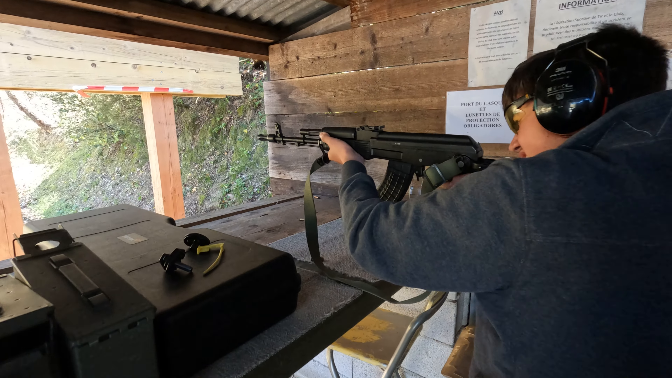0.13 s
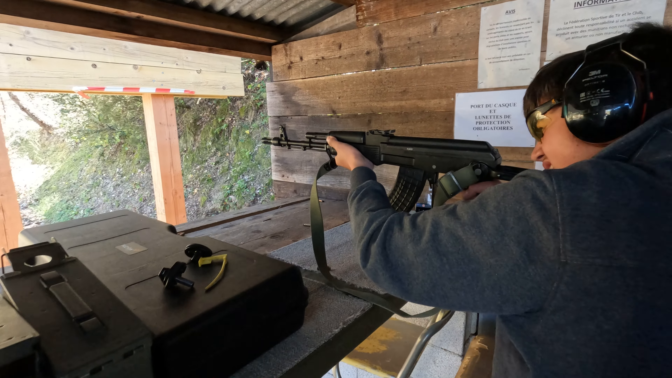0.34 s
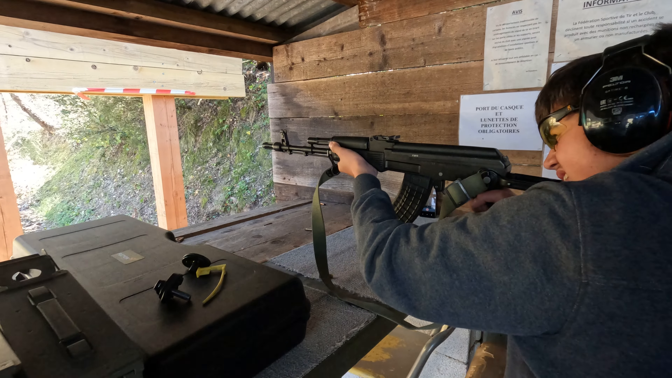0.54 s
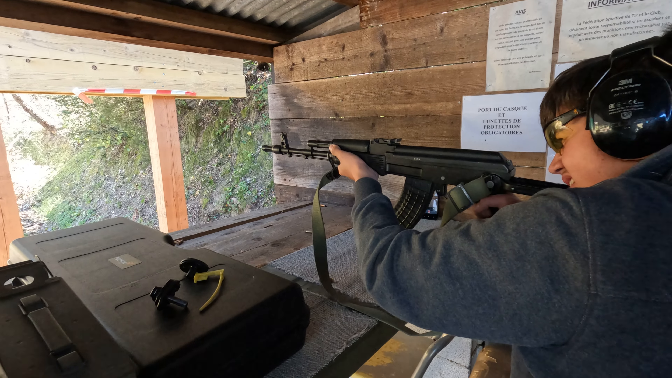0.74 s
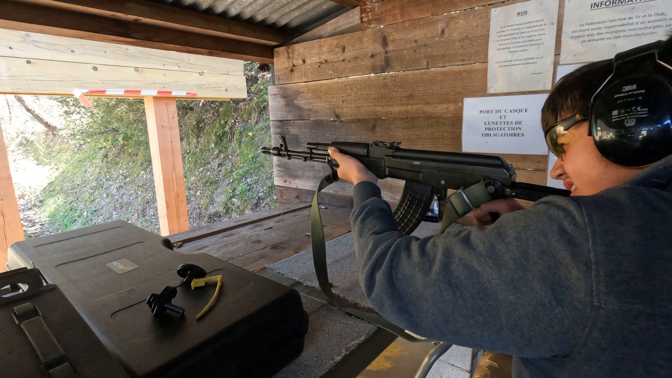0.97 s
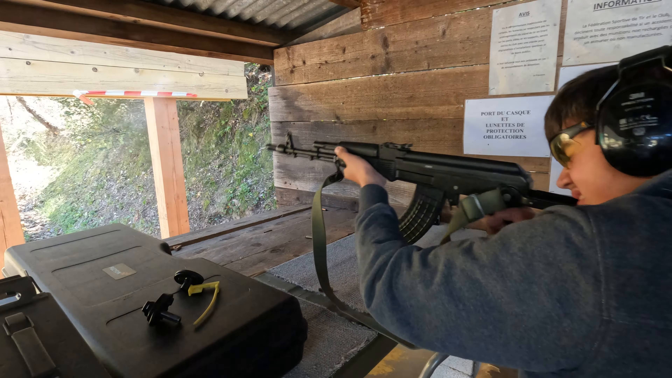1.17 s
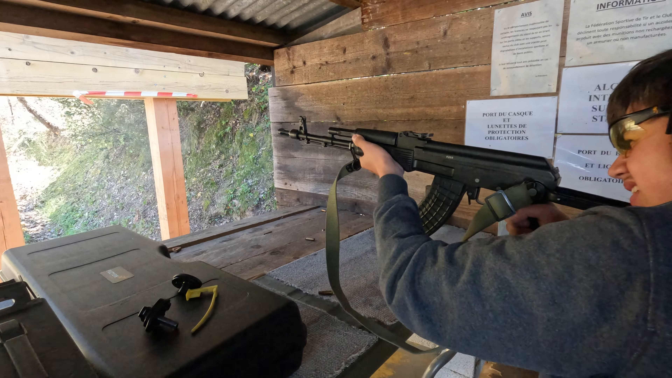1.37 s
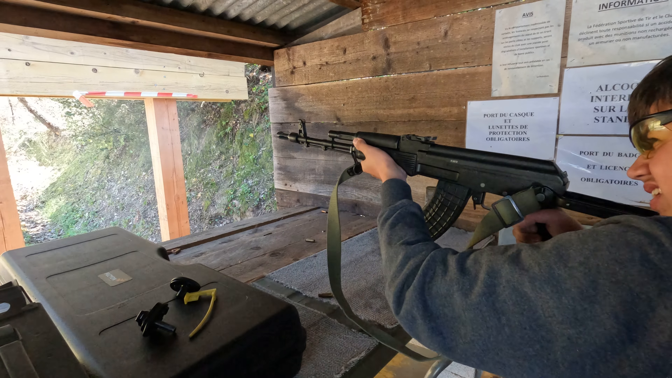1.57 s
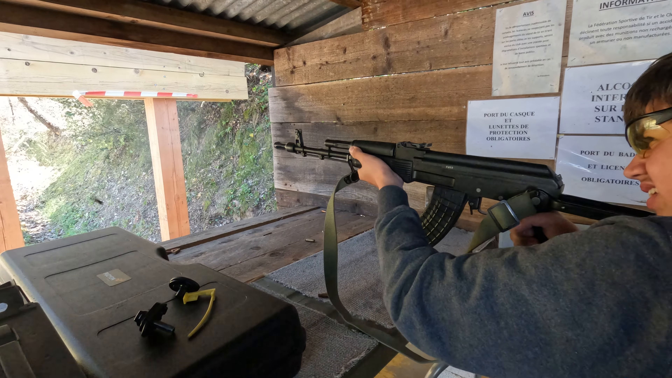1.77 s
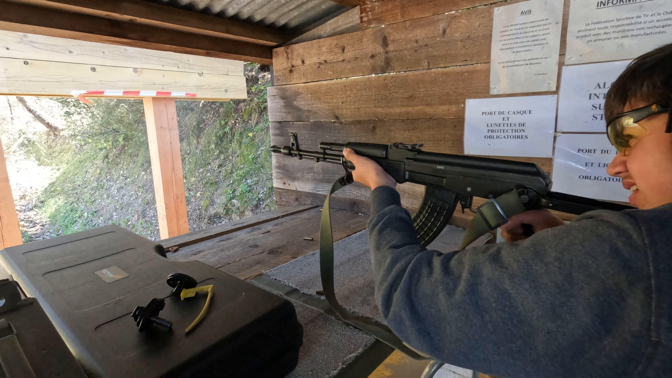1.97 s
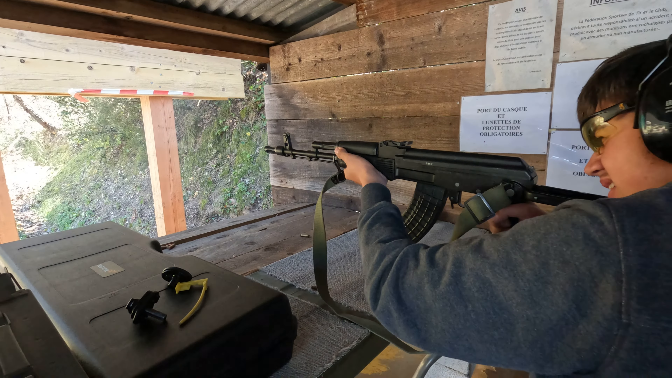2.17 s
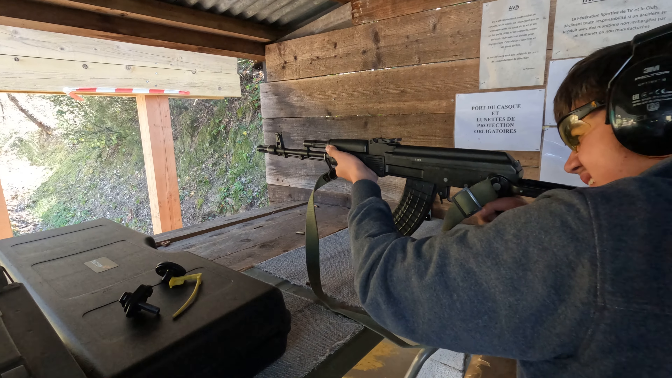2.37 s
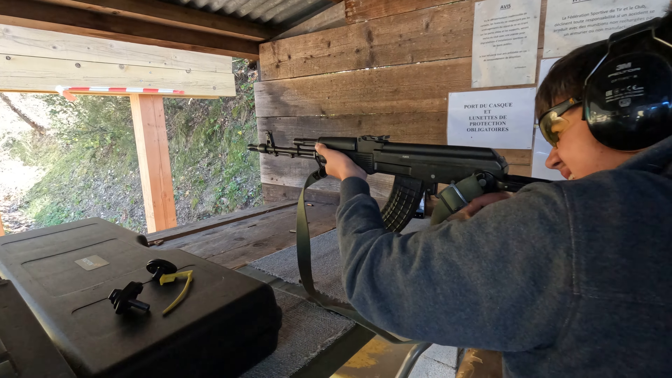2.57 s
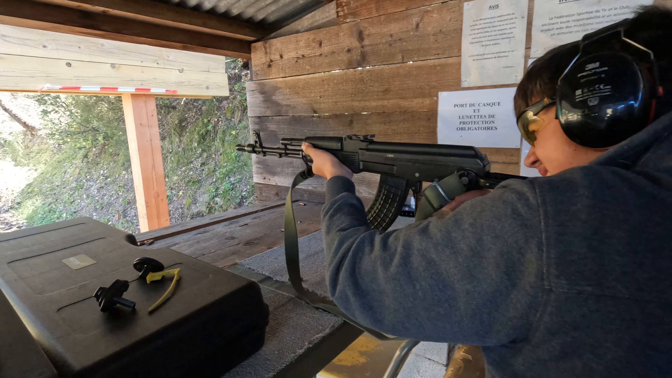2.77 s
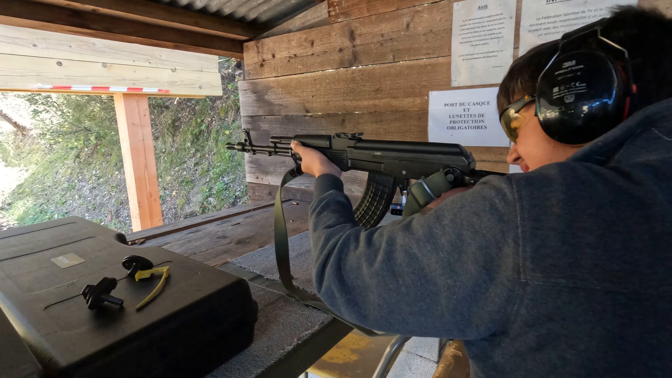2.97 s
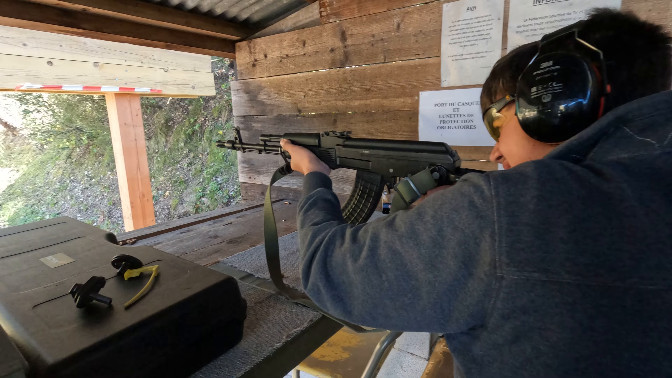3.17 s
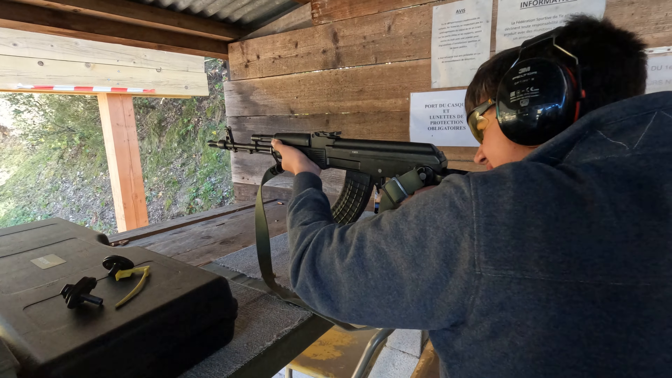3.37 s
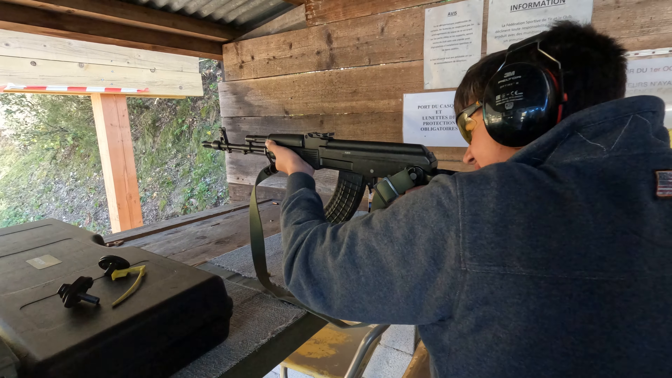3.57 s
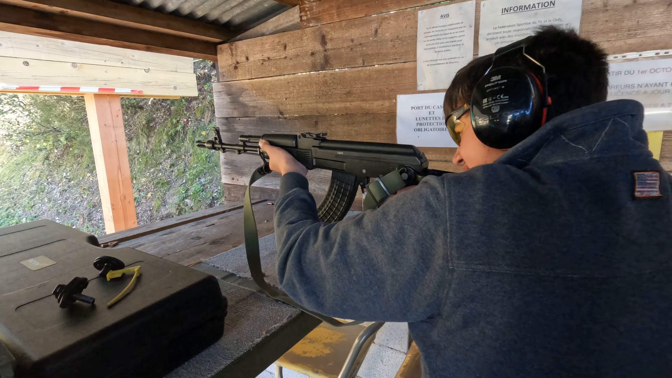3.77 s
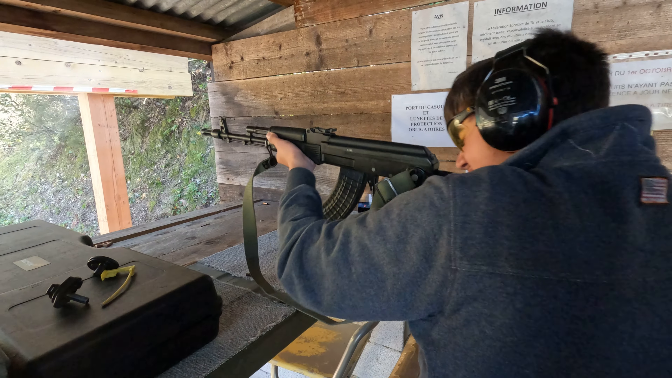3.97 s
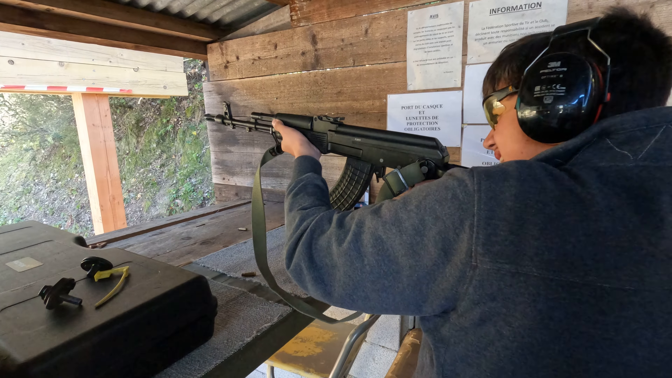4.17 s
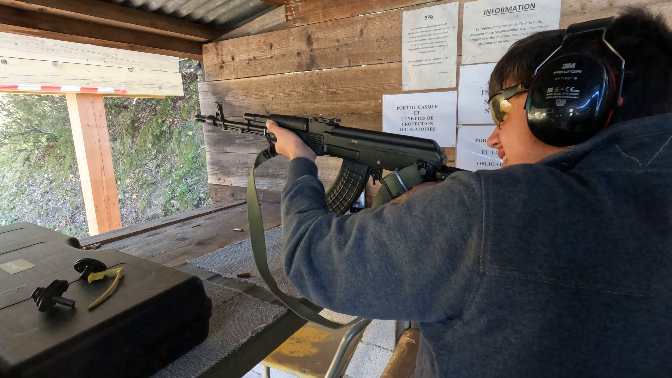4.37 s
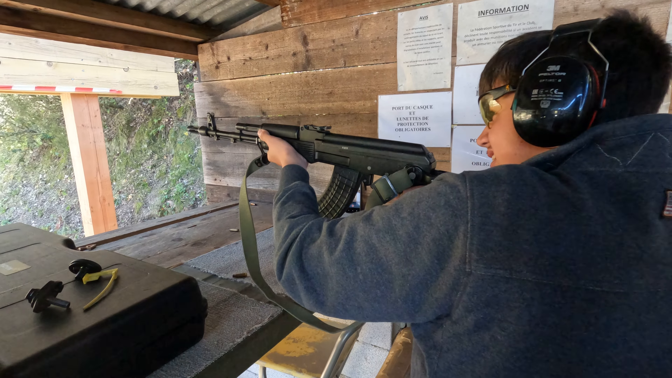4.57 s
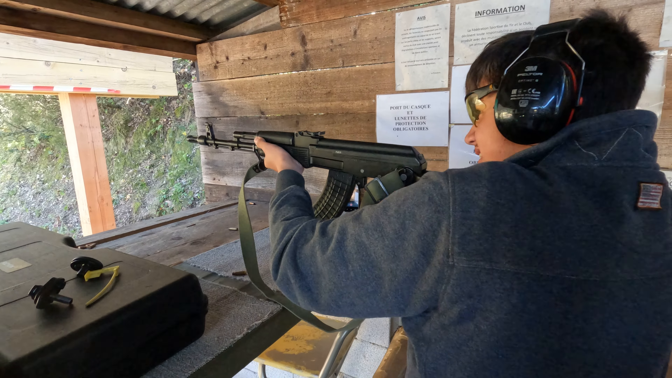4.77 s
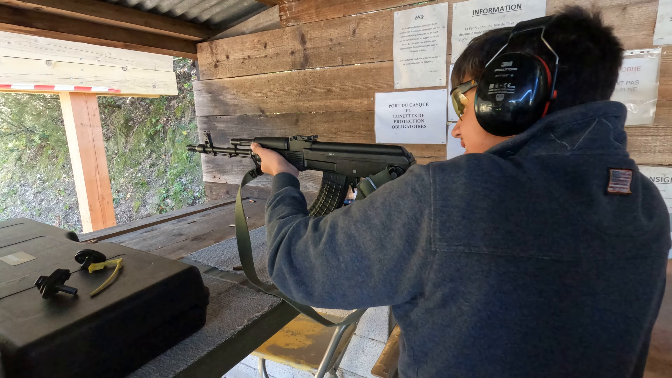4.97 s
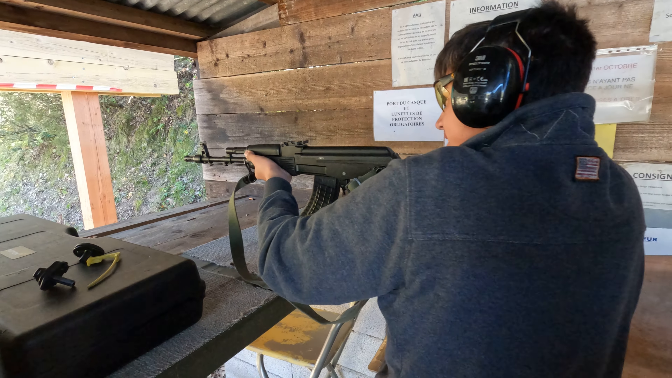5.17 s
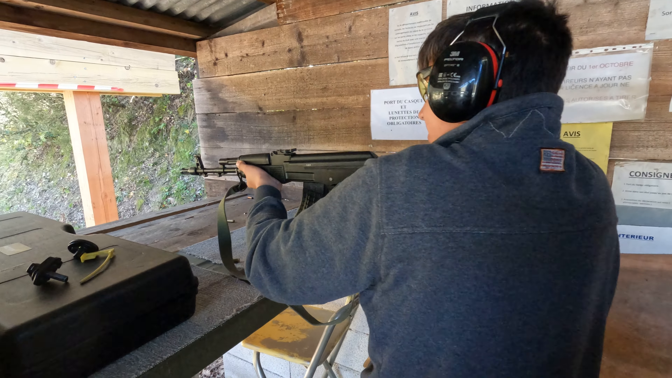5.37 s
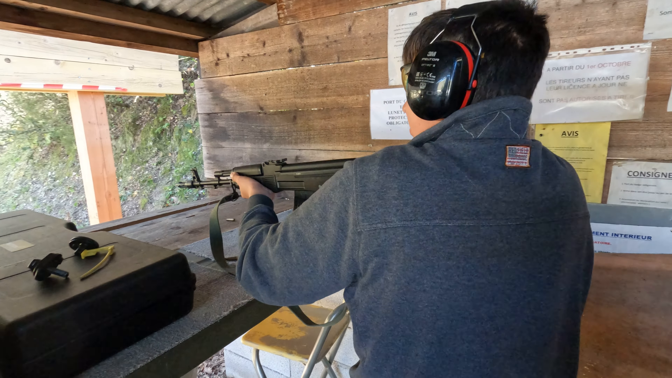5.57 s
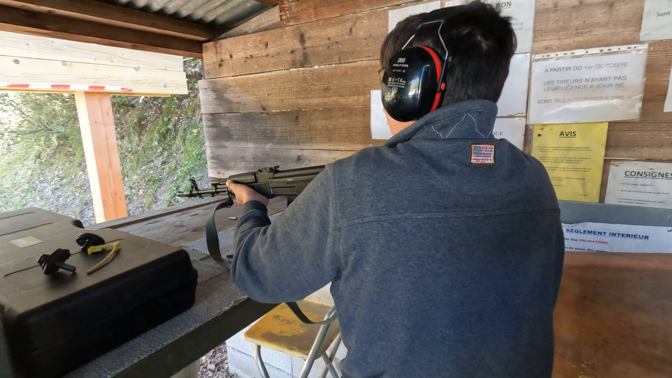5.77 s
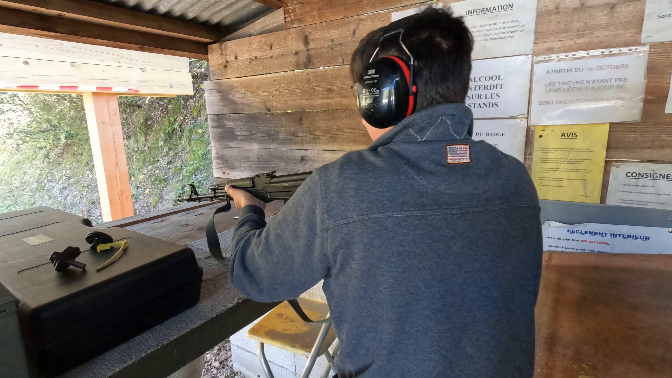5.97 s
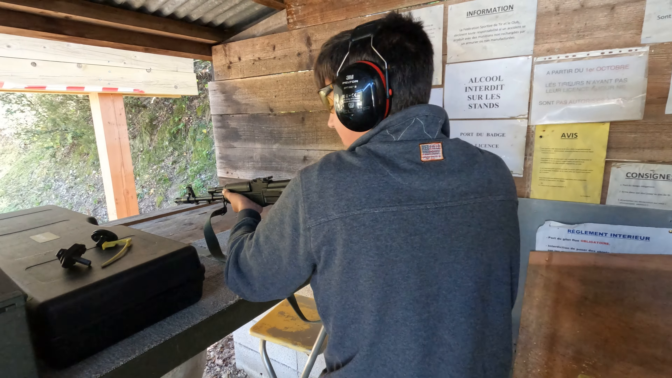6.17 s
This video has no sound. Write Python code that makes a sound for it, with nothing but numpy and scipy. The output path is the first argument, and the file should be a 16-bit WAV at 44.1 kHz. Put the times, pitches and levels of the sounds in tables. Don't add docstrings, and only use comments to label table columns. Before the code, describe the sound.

A small wooden shed with a tin roof, open to an earth bank, heard from close beside the shooter. Muffled rumble and soft wind buffets open the scene, the treble held down. At 1.25 s a rifle fires: the overloaded microphone opens late, so the crack swells into a thick, clipped boom with ringing roof and barrel, a faint bolt slam and slapback from the bank, fading over about a second. At 1.76 s an empty case knocks hollowly on wood, then bounces with small bright rings at 2.5 and from 3.0 to 3.75 s, rolling lightly. A hard double steel clack comes at 2.58 s; low gusts flutter around 3 s. At 4.0 s a second, similar blast booms and echoes. A case ticks at 4.9 s, and another latch clack, just after a soft thud, lands at 5.38 s. Quiet, dull wind closes it by 6 s.

```python
import sys
import numpy as np
from scipy import signal
from scipy.fft import rfft, irfft
from scipy.io import wavfile
from scipy.ndimage import uniform_filter1d, minimum_filter1d

SR = 44100
rng = np.random.default_rng(int(sys.argv[2]) if len(sys.argv) > 2 else 0)


def amplitude_ratio(level_db):
    exponent = np.asarray(level_db, float) / 20
    return 10 ** exponent


def store_wav(level_fs):
    pcm = np.round(np.clip(np.atleast_2d(level_fs), -1, 1) * 32767)
    wavfile.write(sys.argv[1], SR, pcm.T.astype(np.int16))


N = 274302


def at_hz(points, hz):
    rows = np.array(points)
    return [np.interp(np.log(hz), np.log(rows[:, 0]), column) for column in rows[:, 1:].T]


def rms_one(x):
    return x / np.sqrt(np.mean(x ** 2) + 1e-20)


def cut(x, hz, kind, order=2):
    return signal.sosfilt(signal.butter(order, np.clip(hz, 10, .45 * SR), kind, fs=SR, output="sos"), x)


EDGES_HZ = 30 * 2 ** np.arange(0, 9.2, 1 / 3)


def bands(white):
    for k, (low, high) in enumerate(zip(EDGES_HZ, EDGES_HZ[1:])):
        yield np.sqrt(low * high), cut(white[k % 2], [low, high], "band")


def coloured(white, colour):
    return rms_one(sum(amplitude_ratio(at_hz(colour, hz)[0]) * band for hz, band in bands(white)))


def resonate(x, modes):
    out = 0
    for k, (hz, width_hz, db) in enumerate(modes):
        r = np.exp(-np.pi * width_hz / SR)
        b = (1 - r * r) / 2 * np.array([1, 0, -1])
        a = [1, -2 * r * np.cos(2 * np.pi * hz / SR), r * r]
        out = out + (-1) ** k * amplitude_ratio(db) * signal.lfilter(b, a, x)
    return out


def swell(t, peak_s, t60_s, steep):
    rise = np.clip(t / peak_s, 0, 1)
    return np.sin(np.pi / 2 * rise) ** steep * amplitude_ratio(-60 * np.maximum(t - peak_s, 0) / t60_s)


def drift(rate_hz):
    r = np.exp(-80 * np.pi * rate_hz / SR)
    slow = signal.lfilter([1], [1, -2 * r, r * r], rng.standard_normal(N // 40 + 2002))[2000:]
    return np.interp(np.arange(N) / 40, np.arange(len(slow)), rms_one(slow))


def reflections(shape, uneven_db):
    size_db = uneven_db * np.minimum(rng.exponential(1, shape), 4)
    return rms_one(rng.standard_normal(shape) * amplitude_ratio(size_db))


def add(out, s, x):
    i = round(s * SR)
    out[i:i + len(x)] += x[:len(out) - i]


# open level/dB, depth/dB, closing/s, reopening t60/s
GATE = [
    (-44, 16, 1.387, 9.8),
    (-44.5, 25, 1.0, 7.5),
    (-44.5, 38.5, .7, 6.0),
]
EARLIER_SHOT_S = -1.615


def gate_db(t, depth_db, closing_s, t60_s):
    blasts_s = [EARLIER_SHOT_S, *np.array(SHOTS)[:, 0]]
    return -depth_db * np.max([swell(t - s, closing_s, t60_s, steep=.9) for s in blasts_s], axis=0)


# f/Hz, density/dB per Hz
RUMBLE = [(53, -26.5), (90, -3), (250, -7), (500, -12), (1000, -16.5), (1600, -25), (2500, -28.5),
          (4000, -38.5), (6500, -46), (10000, -55), (15500, -69.5)]
# t/s, peak level/dB, half length/s
GUSTS = [(0.128, -56, 0.022), (.40, -46, 0.031), (0.462, -37, 0.033), (0.598, -55, .05),
         (0.957, -44, 0.051), (1.052, -36, 0.046), (1.156, -37, .03), (1.23, -41, 0.082),
         (1.96, -49, 0.023), (2.095, -49.5, .045), (2.38, -53, .025), (2.492, -52, 0.069),
         (2.756, -49.5, 0.062), (2.912, -45.5, 0.055), (3.013, -37.5, .04), (3.13, -39.5, 0.015),
         (3.31, -48.5, 0.055), (4.715, -52, 0.019), (5.313, -53, 0.027), (3.80, -53, .1),
         (5.948, -52, 0.055), (6.10, -45, 0.035)]
BREEZE_DB, BREEZE_SWING_DB, BREEZE_GATED = -47, 1.5, 0.61
CLACK_DUCK_DB, CLACK_DUCK_T60_S = -0.5, 2.5
GUST_HISS_DB = 25


def air():
    t = np.arange(N) / SR
    shut_db = [gate_db(t, *row[1:]) for row in GATE]
    rumble_db, treble_db, top_db = [row[0] + shut for row, shut in zip(GATE, shut_db)]
    for s, *_ in LATCH:
        duck_db = CLACK_DUCK_DB * swell(t - s, 0.22, CLACK_DUCK_T60_S, steep=1.5)
        rumble_db = rumble_db - .5 * duck_db
        treble_db = treble_db - duck_db
        top_db = top_db - duck_db

    wind = cut(cut(rng.standard_normal(N), 65, "low", order=3), 5, "high")
    wind = wind / uniform_filter1d(wind ** 2, size=3000) ** .3
    lumps = amplitude_ratio(1.2 * drift(19))
    puffs = sum(amplitude_ratio(db) * np.exp(-((t - s) / half_s) ** 2) for s, db, half_s in GUSTS)
    hiss_db = 20 * np.log10(1 + amplitude_ratio(GUST_HISS_DB) * puffs)
    treble_db = treble_db + hiss_db
    top_db = top_db + hiss_db

    together_db = .8 * drift(6.6)
    rumble = np.zeros(N)
    for hz, band in bands(rng.standard_normal((2, N))):
        share = np.clip(np.log(hz / 800) / np.log(3.4), 0, 1)
        top_share = np.clip(np.log(hz / 2700) / np.log(2.2), 0, 1)
        level_db = rumble_db + share * (treble_db - rumble_db) + top_share * (top_db - treble_db)
        rumble += amplitude_ratio(level_db + 26.0 + at_hz(RUMBLE, hz)[0] + together_db) * band
    breeze = amplitude_ratio(BREEZE_DB + BREEZE_GATED * shut_db[0] + BREEZE_SWING_DB * drift(6))
    return rumble + lumps * (breeze + puffs) * rms_one(wind)


# t/s, knock peak/dB, knock centre f/Hz, low ring level/dB, high rings level/dB
DROPS = [(1.757, -50, 11000, -79.5, -61), (2.5069, -48.5, 8900, -53, -60), (2.981, -50.5, 4970, -54, -70),
         (3.058, -68.5, 6000, -74.5, -77.5), (3.18, -53, 3480, -49, -82), (3.305, -74.5, 3960, -60, -81),
         (3.436, -62, 7000, -65, -68), (3.548, -58.5, 6900, -75.5, -68), (3.596, -66, 9000, -87, -80),
         (3.672, -71.5, 8000, -54.5, -67), (3.753, -58.5, 4950, -77.5, -68.5),
         (4.890, -55.5, 5000, -65, -64), (.27, -77.5, 6000, -89, -80), (5.65, -80, 6000, -89, -86),
         (5.89, -79, 6000, -89.5, -81)]
# f/Hz, t60/s, width/Hz
CASE = [
    (2272, 0.26, 170),
    (8774, 0.37, 85),
    (14720, .23, 65),
]
CASE_TUNING = [.985, 1.011, .985]
TOP_RING_DB = -3.5


def cases():
    out, t = np.zeros(N), np.arange(round(.5 * SR)) / SR
    knock_shape = swell(t, .003, 0.047, steep=1.3) + amplitude_ratio(-6.5) * swell(t, 0.019, .13, steep=1.4)
    draws = rng.standard_normal((len(DROPS), 2, len(t)))
    for (s, db, hz, low_db, high_db), (white, tumble) in zip(DROPS, draws):
        knock = rms_one(cut(white, [hz / 4.9, hz * 1.3], "band"))
        landing = amplitude_ratio(db - 8.0) * knock * knock_shape
        tuning = CASE_TUNING[np.searchsorted(np.array(SHOTS)[:, 0], s)]
        rings_db = [low_db, high_db, high_db + TOP_RING_DB]
        for (mode_hz, t60_s, width_hz), ring_db in zip(CASE, rings_db):
            mode = [(mode_hz * tuning, width_hz, 0)]
            ring = rms_one(resonate(resonate(tumble, mode), mode))
            landing += amplitude_ratio(ring_db - 5.0) * swell(t, 0.0031, t60_s, steep=1.3) * ring
        add(out, s - .001, landing)
    return out


# t/s, strength/dB
SHOTS = [
    (1.2459, -1.43),
    (4.001, -1.37),
]
# f/Hz, density/dB per Hz, time to peak/s, t60/s, outdoor tail level/dB, tail t60/s
SHED = [(46.7, -16.5, 0.23, 0.46, -21, 1.2), (80, 1.5, 0.079, 0.21, -15.5, 2.15),
        (142, 1.5, 0.092, 0.33, -19.5, 0.78), (300, 0, 0.069, 0.23, -18.5, 0.66),
        (555.7, -3, 0.075, 0.31, -18, 1.48), (1670, -11.5, 0.058, 0.29, -26.5, 1.62),
        (3070, -11, 0.038, 0.27, -32.5, 1.42), (6800, -23, 0.026, 0.29, -36, 0.31),
        (11000, -34, 0.037, 0.25, -35, 0.29), (15180, -52, .03, .3, -35.5, .3)]
# f/Hz, level/dB, time to peak/s, t60/s
BOOM = [(75, -23.5, 0.025, .6), (87, -24, 0.12, 1), (141.2, -13.5, 0.038, .4), (227.8, -22.5, 0.11, 0.27),
        (243.85, -15.5, 0.053, 0.6), (300.6, -18, 0.055, .3), (503.6, -16, 0.043, 0.42),
        (748, -23.5, 0.085, 0.078), (971, -22.5, 0.033, 0.2)]
# delay/s, swell/s, level/dB, top f/Hz, t60/s
BANK = [
    (.235, 0.055, -35.5, 5880, 0.23),
    (0.302, 0.036, -39, 4650, 0.28),
    (.333, 0.0015, -25, 1477, 0.3),
    (.45, 0.044, -34.5, 300, 0.23),
]
# f/Hz, width/Hz, level/dB
LEAD_TONES = [(150, 83, 0.5), (335, 55, -3), (627, 9, 0.5), (1050, 30, -1), (1600, 170, -3.5), (2120, 30, -6),
              (2534, 76, -3.5), (3380, 150, -5.5), (3806, 45, -1), (4720, 81, -5.5), (5600, 98, -9),
              (6450, 76, -10.5), (6940, 51, -10), (7770, 34, -12), (9100, 100, -18), (10360, 210, -25),
              (12400, 400, -25.5)]
BLAST_DB, SAMENESS = 8, .7
LEAD_S, LEAD_DB = 0.04, -12.5
BOLT_DELAY_S, BOLT_DB = .12, -42.5


def rifle():
    out, t = np.zeros(N), np.arange(round(1.5 * SR)) / SR
    shed = reflections((2, len(t)), 2.4)
    for s, strength_db in SHOTS:
        white = SAMENESS * shed + np.sqrt(1 - SAMENESS ** 2) * reflections((2, len(t)), 9.0)
        blast = 0
        for hz, band in bands(white):
            db, peak_s, t60_s, tail_db, tail_t60_s = at_hz(SHED, hz)
            shape = swell(t, peak_s, t60_s, steep=2.0)
            shape = shape + amplitude_ratio(tail_db) * swell(t, 0.067, tail_t60_s, steep=1.3)
            for delay_s, rise_s, echo_db, top_hz, echo_t60_s in BANK:
                dull = 1 / (1 + (hz / top_hz) ** 4.1)
                shape = shape + amplitude_ratio(echo_db) * dull * swell(t - delay_s, rise_s, echo_t60_s, steep=1.34)
            blast = blast + amplitude_ratio(db) * shape * band
        add(out, s, amplitude_ratio(BLAST_DB + strength_db) * blast)

        for k, (hz, db, peak_s, t60_s) in enumerate(BOOM):
            tone = np.sin(2 * np.pi * hz * t + 2.4 * k)
            add(out, s, amplitude_ratio(db) * swell(t, peak_s, t60_s, steep=1.5) * tone)

        wide = [(hz, 3 * width_hz, 0) for hz, width_hz, _ in LEAD_TONES]
        rings = rms_one(resonate(resonate(rng.standard_normal(len(t)), LEAD_TONES), wide))
        add(out, s - .011, amplitude_ratio(LEAD_DB) * rings * swell(t, LEAD_S, 0.028, steep=2.6))

        bolt = cut(rng.standard_normal(len(t)), 3500, "high") * swell(t, 0.0065, 0.1, steep=1.2)
        add(out, s + BOLT_DELAY_S, amplitude_ratio(BOLT_DB) * bolt)
    return out


# f/Hz, density/dB per Hz
WALL = [(150, -33), (250, -3), (458, -14.5), (593, -2.5), (1460, -8), (3510, -4.5), (7770, -36.5),
        (8920, -33), (15500, -41.5)]
# f/Hz, width/Hz, level/dB
ROLL = [(2280, 330, -2), (3350, 400, 2), (5190, 1490, -10), (8000, 2200, -16.5), (11970, 700, -18)]
WALL_S, WALL_DB = 1.7585, -31.5
ROLL_S, ROLL_DB = 2.66, -69.5


def boards():
    out, t = np.zeros(N), np.arange(round(.4 * SR)) / SR
    shape = swell(t, 0.0013, 0.038, steep=1.06) + amplitude_ratio(-4.5) * swell(t, 0.016, 0.15, steep=1.5)
    knock = coloured(reflections((2, len(t)), 2.5), WALL)
    add(out, WALL_S, amplitude_ratio(WALL_DB) * shape * knock)
    roll = rms_one(resonate(reflections(len(t), 2.7), ROLL))
    add(out, ROLL_S, amplitude_ratio(ROLL_DB) * roll * swell(t, .2, 0.29, steep=.4))
    return out


# t/s, peak level/dB, second contact delay/s, second level/dB, edge level/dB
LATCH = [
    (2.577, -18, .008, -6, 2.5),
    (5.380, -17.5, .017, -7.5, -2.5),
]
# f/Hz, density/dB per Hz
LATCH_COLOUR = [(290, -52), (500, -6), (781, -10), (941, -4), (1800, -2), (2430, -11), (2800, -4),
                (3240, -10), (3630, -5), (12300, -23), (15500, -35)]
# f/Hz, width/Hz, level/dB
LATCH_RINGS = [(903, 40, 2.5), (995, 74, 0), (1380, 70, 0), (1790, 59, 0), (2030, 60, -5.5), (2717, 29, 1),
               (2900, 60, -5), (3735, 45, -11), (3973, 73, -7.5), (4110, 80, -9), (5050, 76, -10.5),
               (5530, 62, -13.5), (7700, 81, -15.5)]
SPRING_HZ, SPRING_DB, SPRING_T60_S = 2800, -29, .18


def latch():
    out, t = np.zeros(N), np.arange(round(.4 * SR)) / SR
    for s, db, later_s, second_db, edge_db in LATCH:
        shape = swell(t, .0008, 0.053, steep=0.87)
        shape += amplitude_ratio(second_db) * swell(t - later_s, 0.0019, 0.056, steep=1.1)
        white = reflections((2, len(t)), 2.1)
        rattle = cut(coloured(white, LATCH_COLOUR), 760, "high", order=4)
        edge = rms_one(cut(white[1], [11000, 14000], "band"))
        rattle += amplitude_ratio(edge_db - 16.5) * edge
        add(out, s - .001, amplitude_ratio(db - 13.0) * shape * rattle)

        blows = np.full(len(t), 1e-18)
        blows[[0, round(later_s * SR)]] = 1, -amplitude_ratio(second_db)
        struck = resonate(blows, LATCH_RINGS)
        add(out, s, amplitude_ratio(db - 4.5) * struck / np.abs(struck).max())

        tail = coloured(white[::-1], LATCH_COLOUR) + amplitude_ratio(-1.0) * rms_one(resonate(white[0], LATCH_RINGS))
        tail = cut(tail, [850, 7000], "band")
        add(out, s, amplitude_ratio(db - 19.5) * tail * swell(t, 0.016, 0.18, steep=0.94))

        spring = [(SPRING_HZ, 110, 0)]
        sing = rms_one(resonate(resonate(white[1], spring), spring))
        spring_db = db + SPRING_DB - 2.0 * edge_db
        add(out, s, amplitude_ratio(spring_db) * sing * swell(t, .003, SPRING_T60_S, steep=1.1))

    thud = np.sin(2 * np.pi * 205 * t) * swell(t, 0.0078, 0.044, steep=2.6)
    add(out, 5.362, amplitude_ratio(-39) * thud)
    return out


def smeared(x):
    frame = round(.035 * SR)
    ramp = np.linspace(0, 1, frame) ** 2.5
    smear = rms_one(rng.standard_normal(frame) * ramp) / np.sqrt(frame)
    return x + amplitude_ratio(-12.5) * signal.fftconvolve(x, smear)[frame - 1:]


def scene():
    mono = air() + rifle() + smeared(cases() + boards() + latch())
    return np.array([mono, mono])


def roll_off(x):
    return signal.sosfilt(signal.butter(12, 15700, fs=SR, output="sos"), x)


def record(dry):
    hz = np.fft.rfftfreq(N, 1 / SR)
    top = irfft(rfft(dry[0]) / (1 + (11200 / (hz + 1)) ** 24.0), N)
    apart = .45 * top + 0.69 * np.roll(top, 311)
    peak = -minimum_filter1d(-np.abs(dry[0]), size=129)
    gain = uniform_filter1d(1 / np.maximum(peak / .98, 1), size=65)
    mix = gain * (dry + apart * np.array([[1], [-1]]))
    return roll_off(mix)


dry = scene()
out = record(dry)
store_wav(out)
```